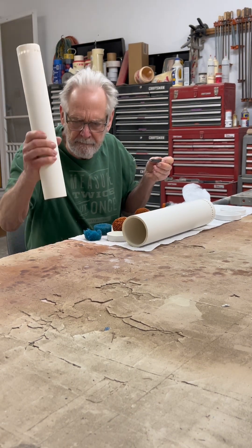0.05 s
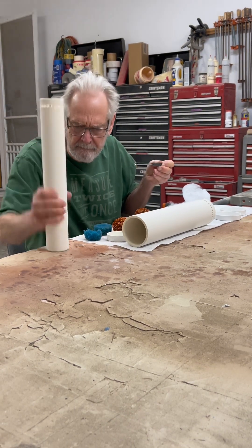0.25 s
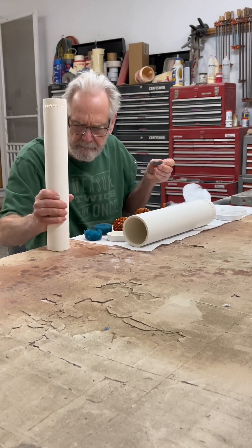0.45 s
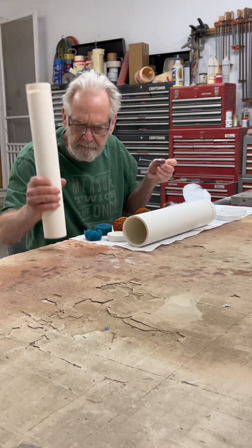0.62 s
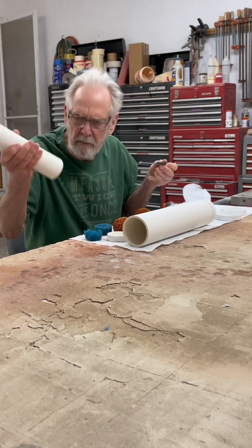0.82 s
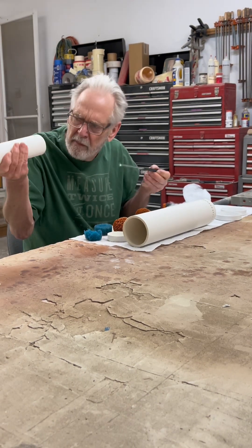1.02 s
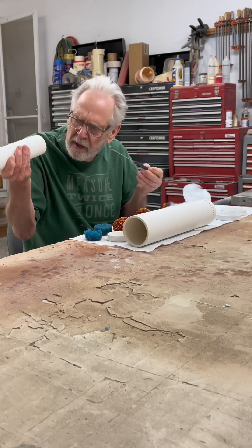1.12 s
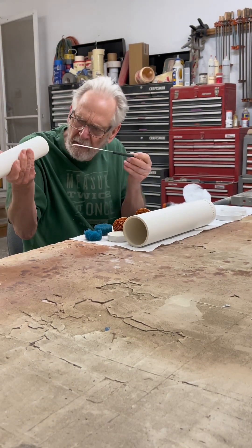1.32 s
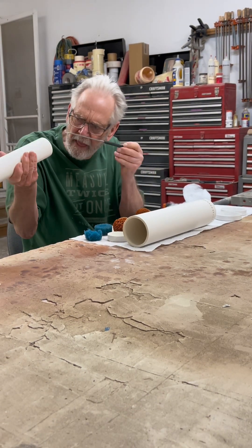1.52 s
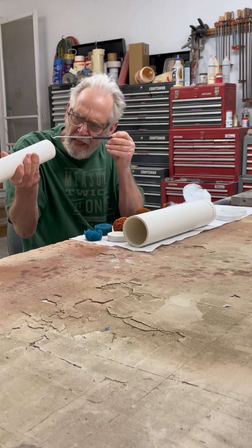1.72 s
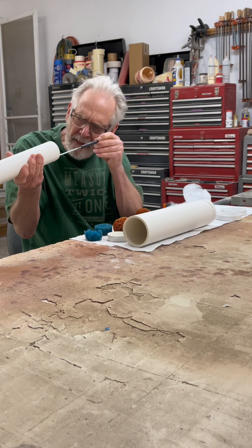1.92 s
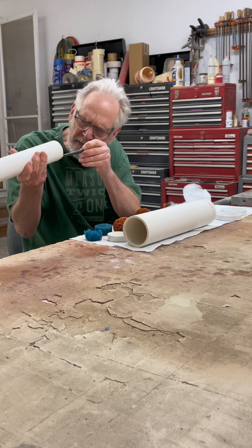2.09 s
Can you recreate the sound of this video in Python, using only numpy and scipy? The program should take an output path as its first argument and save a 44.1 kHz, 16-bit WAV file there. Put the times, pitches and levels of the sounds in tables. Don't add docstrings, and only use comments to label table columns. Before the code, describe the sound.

A plastic pipe is knocked on end on a heavy workbench at about 0.24 seconds: a brief graze, a hard crack rocking flat, and a deep hollow ring. The workshop's tail is squashed, then held up, fading over low rumble with a faint airy pipe tone. A barely audible slide at 0.76, a tiny tick at 1.54, then bright rod ticks and scraping at 1.96 and, stronger, 2.06.

```python
import sys
import numpy as np
from scipy import signal
from scipy.fft import rfft, irfft, next_fast_len
from scipy.io import wavfile
from scipy.ndimage import map_coordinates

SR = 44100
rng = np.random.default_rng(int(sys.argv[2]) if len(sys.argv) > 2 else 0)


def pcm_store(signal):
    levels = np.round(np.clip(np.atleast_2d(signal), -1, 1) * 32767)
    wavfile.write(sys.argv[1], SR, levels.astype(np.int16).T)


def boost_factor(decibels):
    exponent = np.asarray(decibels, float) / 20
    return 10 ** exponent


N = 94815

# (time [s], level [dB])
KNOCKS = [
    (-.33, -24.5),
    (.2385, 1),
]
# (delay [s], level [dB])
CONTACTS = [
    (0, -2),
    (.0045, 1.5),
    (.0085, 1),
]
# (frequency [Hz], density [dB per Hz])
LEAD_IN = [(500, -16.5), (1000, -5.5), (1700, 2.5), (2600, -10.5), (4000, -25.5), (7000, -51.5)]
# (frequency [Hz], density [dB per Hz])
SNAP = [(1000, -20), (2500, -2), (5000, -8.5), (7000, -12.5), (8900, -0.5), (10500, -4), (13500, -23.5)]
# (frequency [Hz], density [dB per Hz])
CRACK = [(120, -43.5), (300, -11), (1500, -5), (2600, -13), (3600, -10), (6200, -31.5), (9000, -33),
         (12000, -31)]
# (frequency [Hz], likeness [0-1])
IMPACT_ALIKE = [(300, 0.97), (2000, 0.69), (9000, 1.0)]
# (frequency [Hz], level [dB], t60 [s])
BODY = [(55, -13, .4), (117.7, -0.5, .36), (250.6, -5, 0.1), (339.4, 2.5, .12), (459.8, -12.5, 0.1),
        (505, -7.5, .3), (531, -8, 0.083), (577, -8.5, .35), (690, -0.5, 0.069), (877, -3.5, 0.076),
        (1024, -10.5, .06), (1320, -11.5, 0.021), (1595.4, -4.5, .05), (2292, -17, .04)]
# (frequency [Hz], level [dB], t60 [s])
AIR = [(339.5, -37.5, 2), (665, -52.5, 2.29)]
# (frequency [Hz], density [dB per Hz])
THROWN = [(28, -39), (60, -9), (200, -5), (500, -1), (1000, -10.5), (2600, -16), (9600, -39.5),
          (9900, -58.5)]
# (frequency [Hz], t60 [s])
ROOM = [(60, 0.57), (250, 0.6), (1000, 0.69), (3000, 0.75), (6000, 0.57), (10000, 0.53)]
# (frequency [Hz], likeness [0-1])
ROOM_ALIKE = [(60, .97), (160, .93), (300, .6), (600, .1), (3000, .2), (9000, .6)]
# (frequency [Hz], density [dB per Hz])
RUMBLE = [(14, -46), (25, -21.5), (114, -9), (214, -25.5), (342, -24.5), (400, -34), (700, -36),
          (1200, -61)]
# (frequency [Hz], likeness [0-1])
RUMBLE_ALIKE = [(30, 1), (200, 0.74), (800, 0.46), (4000, 0.1), (10000, 1)]
# (frequency [Hz], left over centre [dB])
RUMBLE_PAN = [(60, 2.2), (500, 2.3), (3000, 0)]
# (time [s], level [dB])
RUMBLE_LEVEL = [(0, -59), (1.2, -62.5), (1.55, -66.5), (1.75, -67.5), (1.85, -70), (2.15, -63.5)]
# (frequency [Hz], density [dB per Hz])
HISS = [(300, -10), (900, 0), (2500, -1.5), (6000, -10.5), (9000, -6), (14000, -16)]
# (frequency [Hz], density [dB per Hz])
SLIDE = [(5000, -24), (7500, -10), (9200, 3.5), (10500, -12), (13000, -21)]
# (frequency [Hz], level [dB], t60 [s])
TICK = [(2450, -3, .12), (3050, -1, 0.031), (3510, 3, 0.021)]
# (frequency [Hz], density [dB per Hz])
TICK_GRIT = [(60, 3), (200, -20), (900, -60)]
TICK_EDGE = [(1000, -20), (2300, 0), (3800, 2), (5500, -25)]
# (time [s], level [dB], share of hollow tone [ratio])
TAPS = [
    (1.9576, -30.5, 0.33),
    (1.9654, -43.5, 0.479),
    (2.0555, -34.5, 0.28),
    (2.063, -24.5, 0.69),
    (2.0709, -42, 1.2),
    (2.083, -42, 0.58),
    (2.099, -38.5, 0.493),
    (2.111, -45.5, 2.6),
    (2.144, -53, .5),
]
# (time [s], level [dB])
SCRAPE = [
    (1.958, -100),
    (1.966, -60.5),
    (2.05, -77),
    (2.066, -33),
    (2.12, -40.5),
    (2.15, -48.5),
]
# (centre [Hz], width [Hz], level [dB])
ROD = [(4950, 200, -6.5), (6370, 580, 1.5), (8100, 200, -10.5), (8650, 350, 2), (10860, 690, -7),
       (12800, 720, -7)]
# (centre [Hz], width [Hz], level [dB])
MOUTH = [(630, 100, 1), (970, 100, -2), (1240, 270, 0.5), (1700, 490, 0.5), (2250, 300, -3.5),
         (3620, 1600, -10.5)]
# (centre [Hz], width [Hz], level [dB])
ECHO = [(880, 500, -4), (1902, 380, 0.5), (3520, 1500, -10), (4660, 400, -4), (5960, 560, 1),
        (7507, 900, -2.5), (8700, 1100, -3), (11300, 800, -5.5)]
# (time [s], level [dB])
GAIN = [
    (.236, 0),
    (.25, -9),
    (.3, -14),
    (.37, -11.5),
    (.41, -14.5),
    (.51, -6.5),
    (.6, 0.5),
    (.66, 1),
]
# (frequency [Hz], level [dB])
TREBLE = [(9750, -0.5), (10000, -19.5), (10450, -18.5), (10700, -3.5), (11700, -2), (12000, -23), (14500, -29)]

BLOOM_CYCLES = 0.76


def unit(x):
    return x / np.sqrt(np.mean(x ** 2) + 1e-20)


def along(points, hz):
    f, v = np.transpose(points)
    return np.interp(np.log(hz + 1), np.log(f + 1), v)


def curve(rows):
    return np.interp(np.arange(N) / SR, *np.transpose(rows))


def filtered(x, response):
    n = x.shape[-1]
    m = next_fast_len(n + 8192)
    return irfft(rfft(x, m) * response(np.fft.rfftfreq(m, 1 / SR)), m)[..., :n]


def resonances(peaks):
    def response(f):
        total = 0
        for k, (centre, width, db) in enumerate(peaks):
            damping = 1j * f * width
            total = total + (-1) ** k * boost_factor(db) * damping / (centre * centre - f * f + damping)
        return total
    return response


def hiss(spectrum, size):
    return unit(filtered(rng.standard_normal(size), lambda hz: boost_factor(along(spectrum, hz))))


def spread(pair, alike):
    turn = lambda hz: np.arccos(np.clip(along(alike, hz), -1, 1)) / 2
    mid, side = filtered(pair, lambda hz: np.array([np.cos(turn(hz)), np.sin(turn(hz))]))
    return np.array([mid + side, mid - side])


def ring(modes, t, bloom):
    t = np.maximum(t, 0)
    total = 0
    for hz, db, t60 in modes:
        rise = (1 - np.exp(-t * hz / bloom)) ** 2
        total = total + boost_factor(db - 60 * t / t60) * np.sin(2 * np.pi * hz * t) * rise
    return total


def impact_noise(spectrum, size):
    return spread(np.array([hiss(spectrum, size), hiss(spectrum, size)]), IMPACT_ALIKE)


def room(colour):
    hz, t, z = signal.stft(rng.standard_normal((2, 2 * SR)), SR, nperseg=256)
    builds_s = (0.03 + 9.9 / (hz + 100))[:, None]
    decay = boost_factor(-60 * t / along(ROOM, hz)[:, None])
    tail = signal.istft(z * decay * (1 - np.exp(-t / builds_s)), SR, nperseg=256)[1][:, :2 * SR]
    tail = filtered(spread(tail, ROOM_ALIKE), colour)
    tail = tail * (1 - np.exp(-np.arange(2 * SR) / SR / .003))
    return tail / np.linalg.norm(tail[0])


def knocks():
    before = SR // 2
    out = np.zeros((2, before + N + 2 * SR))
    t = np.arange(2 * SR) / SR
    pan_db, body_lag_s = 1.5, .0004
    lift_s, lift_takes_s = .56, .04
    lead_in_s, lead_in_db, lead_in_rise_db = .016, -6.5, 28
    for s, db in KNOCKS:
        at = before + round(s * SR)
        one = impact_noise(SNAP, len(t)) * boost_factor(-8.5 - 60 * t / .006)
        for delay, contact_db in CONTACTS:
            crack = impact_noise(CRACK, len(t)) * boost_factor(-5.5 + contact_db - 60 * t / 0.028)
            crack = crack * (1 - np.exp(-t / 0.0002))
            one += np.roll(crack, round(delay * SR), axis=1)
        body = np.array([ring(BODY, t, BLOOM_CYCLES), ring(BODY, t - body_lag_s, BLOOM_CYCLES)])
        one += 0.99 * body * boost_factor([[pan_db], [-pan_db]])
        lifted = 1 / (1 + np.exp((lift_s - t) / lift_takes_s))
        one += ring(AIR, t, BLOOM_CYCLES) * lifted * boost_factor([[2.2], [-2.2]])
        one += boost_factor(30) * room(lambda hz: boost_factor(along(THROWN, hz)))
        out[:, at:at + len(t)] += boost_factor(db) * one

        n = round(lead_in_s * SR)
        rise = boost_factor(lead_in_db + lead_in_rise_db * (np.arange(n) / n - 1))
        lead_in = hiss(LEAD_IN, n) * rise * np.minimum(np.arange(n) / 150, 1)
        out[:, at - n:at] += boost_factor(db) * lead_in * boost_factor([[-18.], [0]])
    return out[:, before:before + N]


def rumble():
    swell = map_coordinates(rng.standard_normal(40), [np.arange(N) * 9 / SR])
    pair = spread(np.array([hiss(RUMBLE, N), hiss(RUMBLE, N)]), RUMBLE_ALIKE)
    pair = filtered(pair, lambda hz: boost_factor(np.outer([1, -1], along(RUMBLE_PAN, hz))))
    return boost_factor(curve(RUMBLE_LEVEL) + 4 * swell) * pair + boost_factor(-81) * hiss(HISS, (2, N))


def slide():
    centre_s, length_s, level_db = .76, 0.02, -67.5
    t = np.arange(N) / SR
    stroke = np.exp(-.5 * ((t - centre_s) / length_s) ** 2)
    return boost_factor(level_db) * stroke * hiss(SLIDE, N)


def tick():
    t = np.arange(N) / SR - 1.538
    edge = (t > 0) * boost_factor(-60 * np.abs(t) / 0.0097) * hiss(TICK_EDGE, N)
    gritty_ring = ring(TICK, t, 0.65) * (1 + .5 * hiss(TICK_GRIT, N))
    return boost_factor(-72) * (gritty_ring + 1.2 * edge)


def rod():
    tap_t60, tap_room_db, pan_db, mouth_echo = 0.014, 15.5, 1.5, .35
    grains_per_s, grain_spread_db = 900, 0.5
    sharp, hollow = np.zeros(N + 2000), np.zeros(N + 2000)
    wet = np.zeros((2, N + 2 * SR))
    t = np.arange(2000) / SR
    for s, db, share in TAPS:
        at = round(s * SR)
        burst = boost_factor(db + 12.5 - 60 * t / tap_t60) * rng.standard_normal(len(t))
        burst = burst * (1 - np.exp(-t / .0004))
        sharp[at:at + len(t)] += burst
        hollow[at:at + len(t)] += share * burst

        def colour(hz):
            steel = np.abs(resonances(ECHO)(hz)) ** 2
            return steel + mouth_echo * share * np.abs(resonances(MOUTH)(hz))
        wet[:, at:at + 2 * SR] += boost_factor(db + tap_room_db) * room(colour)

    caught = rng.random(N) < grains_per_s / SR
    size = boost_factor(grain_spread_db * rng.exponential(size=N))
    drag = boost_factor(curve(SCRAPE)) * unit(caught * size * rng.standard_normal(N))
    steel = filtered(sharp[:N] + drag, resonances(ROD))
    mouth = filtered(1.4 * hollow[:N] + 1.2 * drag, resonances(MOUTH))
    return (steel + mouth) * boost_factor([[pan_db], [-pan_db]]) + wet[:, :N]


def scene():
    return knocks() + rumble() + slide() + tick() + rod()


def band_limit(x):
    return signal.sosfilt(signal.butter(12, 14650, fs=SR, output="sos"), x)


def record(dry):
    top_hz, port_lag_s, ceiling = 14600, 2.6e-5, .93

    def ports(hz):
        lag = np.exp(np.outer([1j, -1j], np.pi * hz * port_lag_s))
        return boost_factor(along(TREBLE, hz)) * (hz < top_hz) * lag
    x = dry * boost_factor(curve(GAIN))
    limited = x / (1 + np.abs(x / ceiling) ** 6) ** (1 / 6)
    mix = filtered(limited, ports)
    return band_limit(mix)


dry = scene()
out = record(dry)
pcm_store(out)
```